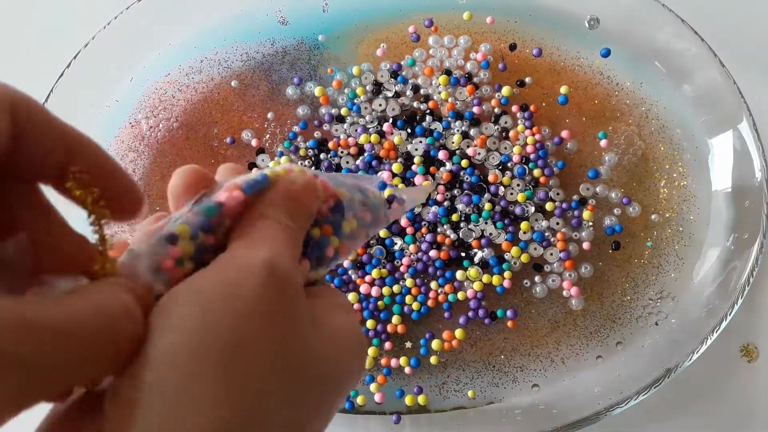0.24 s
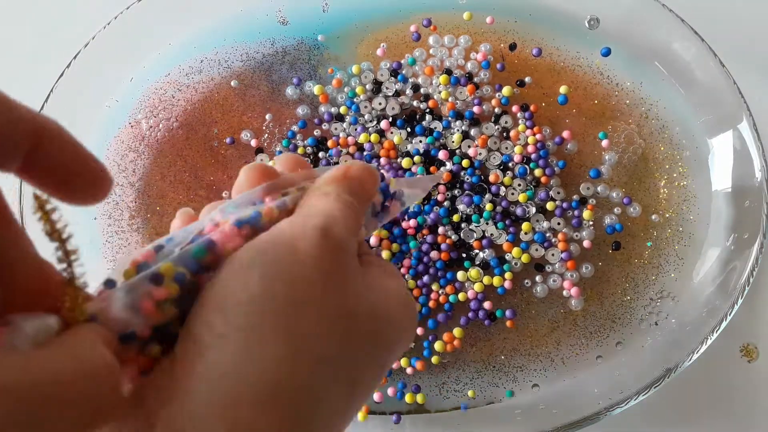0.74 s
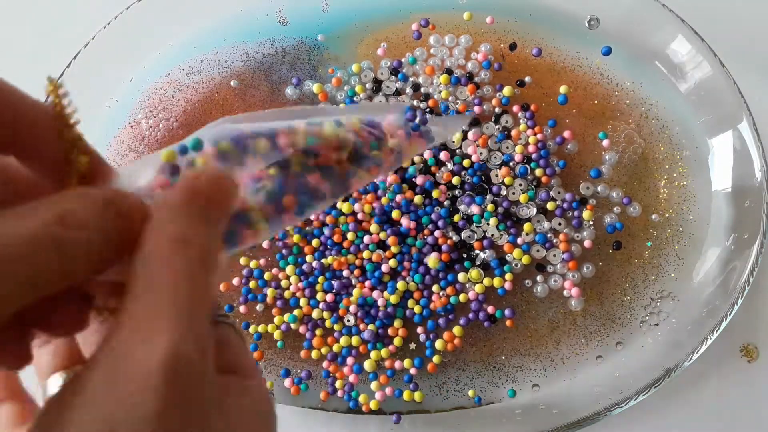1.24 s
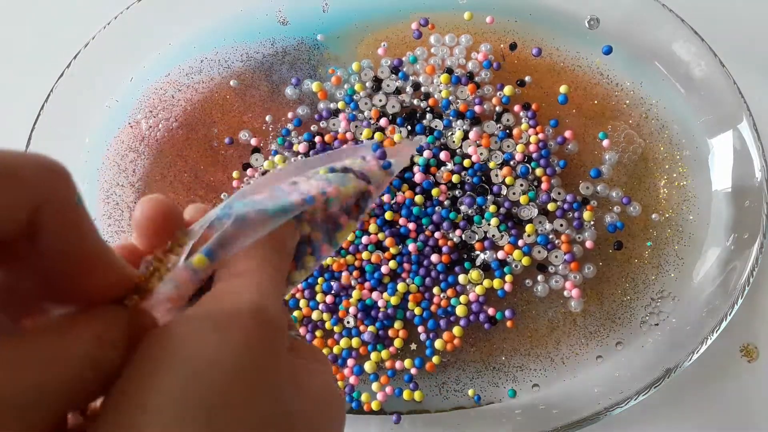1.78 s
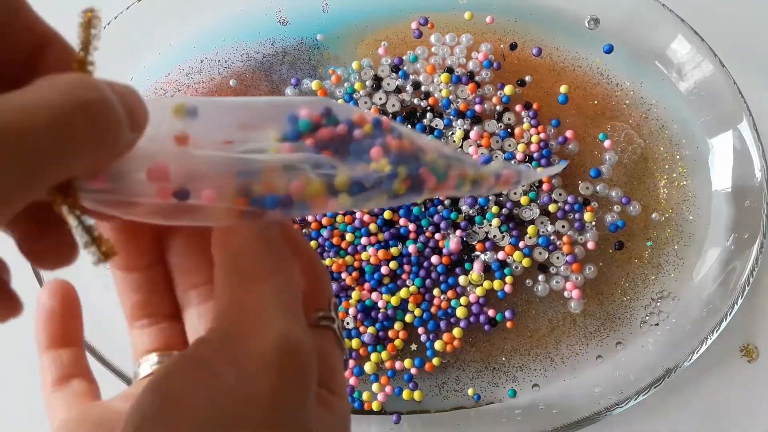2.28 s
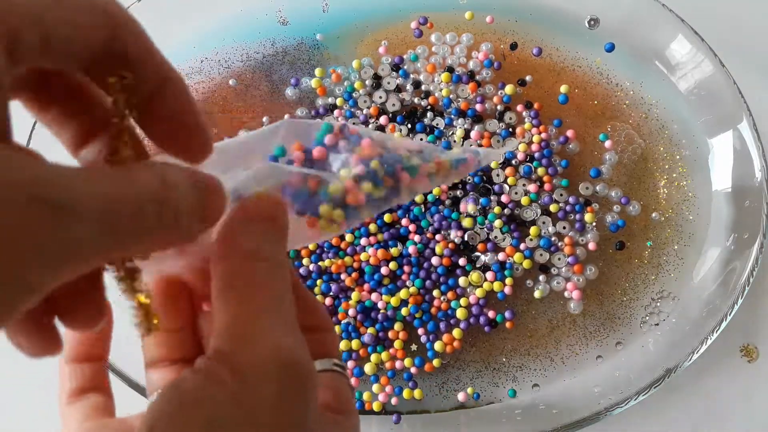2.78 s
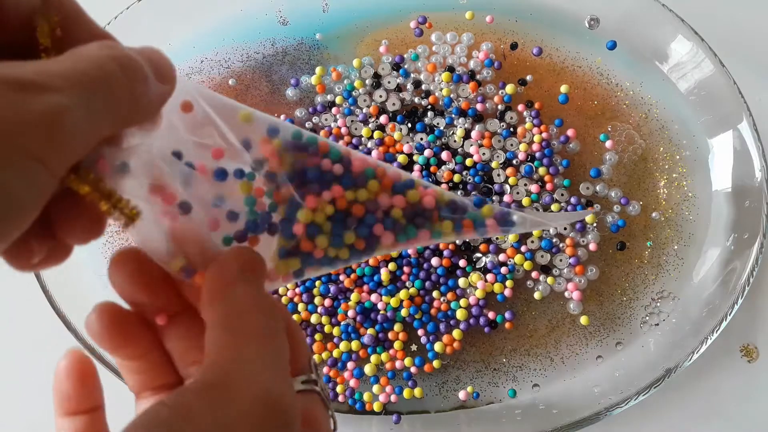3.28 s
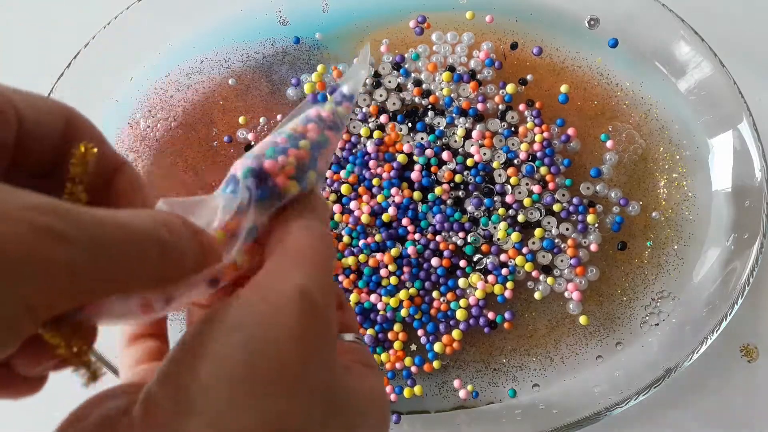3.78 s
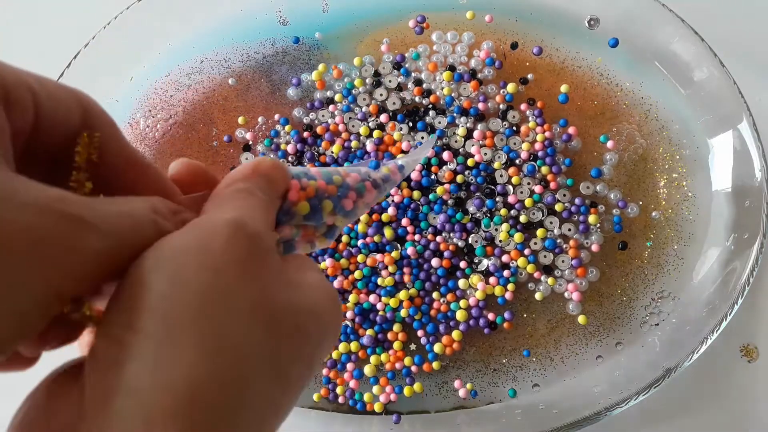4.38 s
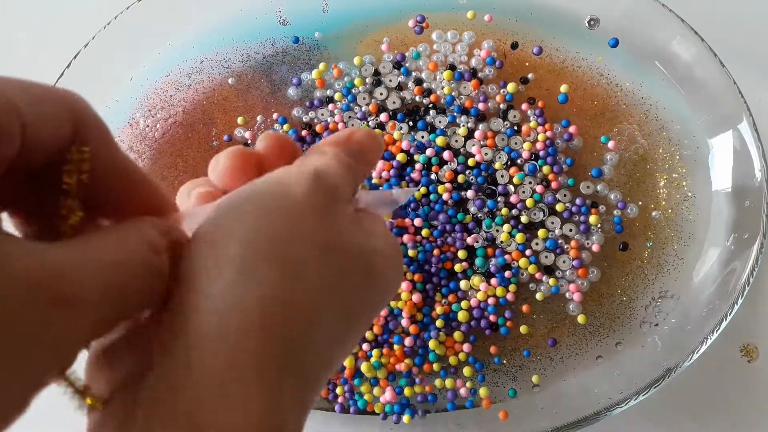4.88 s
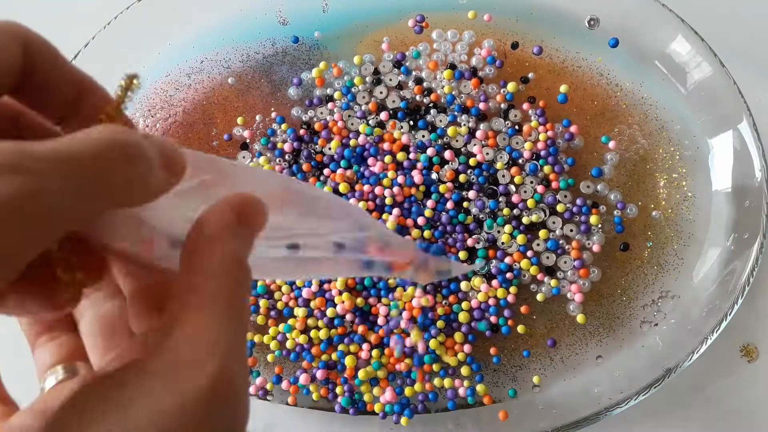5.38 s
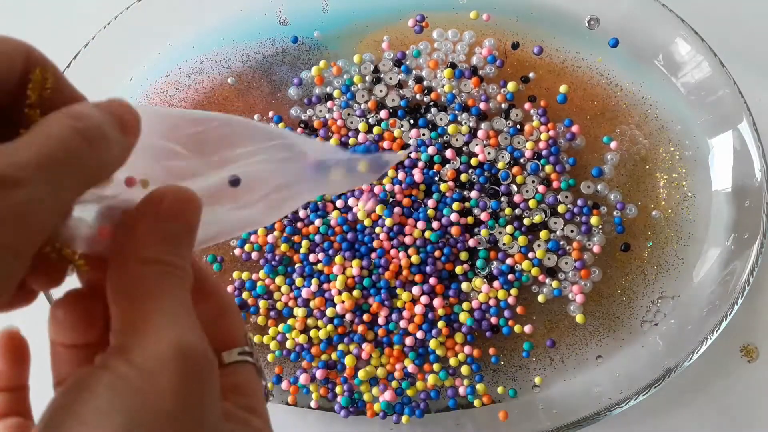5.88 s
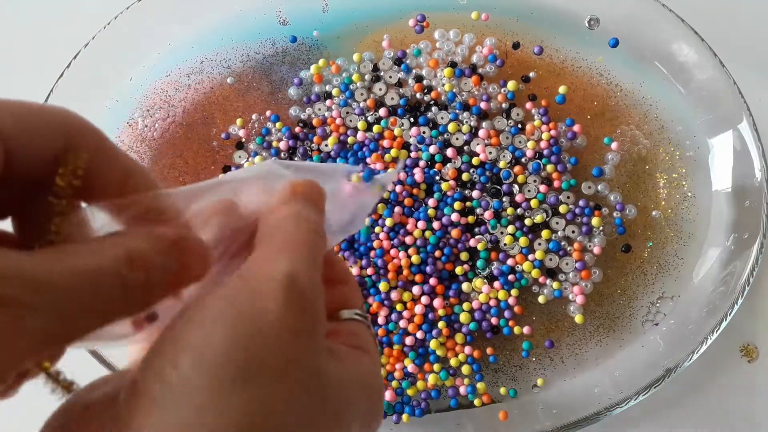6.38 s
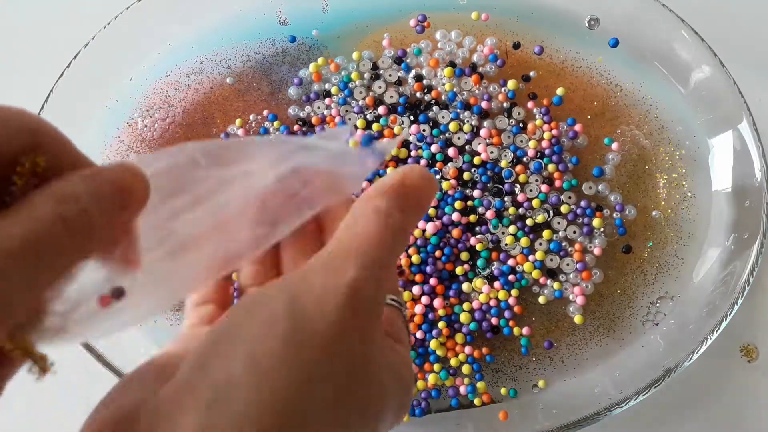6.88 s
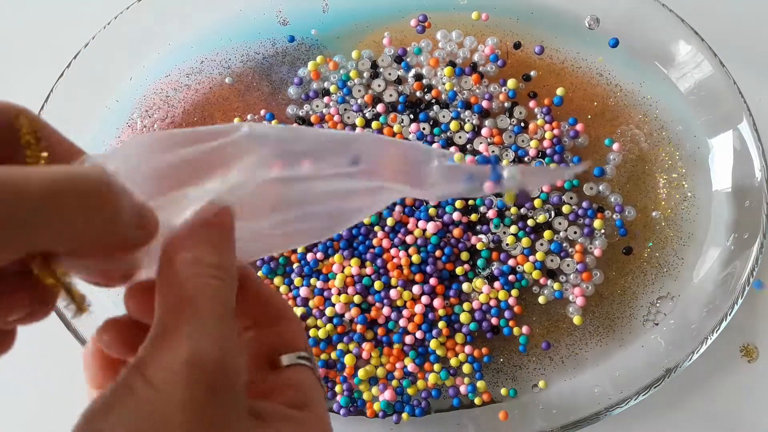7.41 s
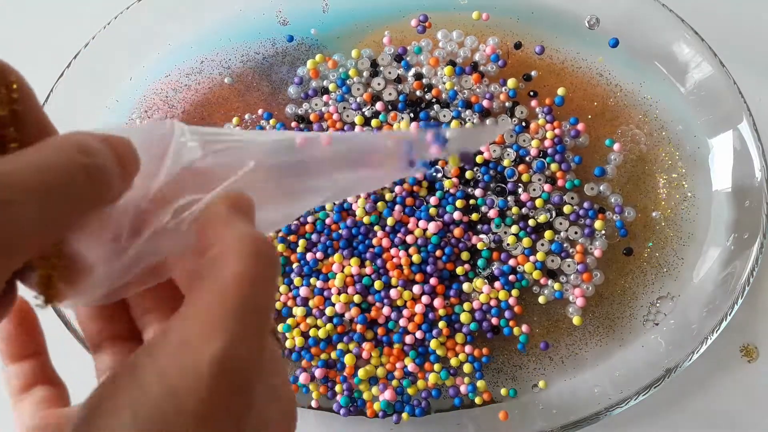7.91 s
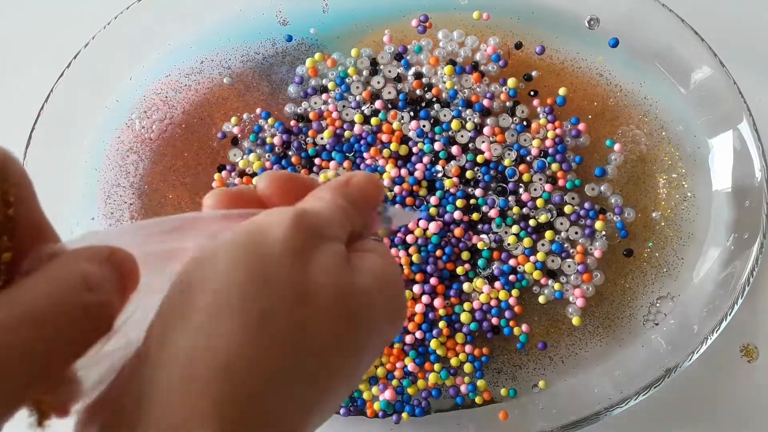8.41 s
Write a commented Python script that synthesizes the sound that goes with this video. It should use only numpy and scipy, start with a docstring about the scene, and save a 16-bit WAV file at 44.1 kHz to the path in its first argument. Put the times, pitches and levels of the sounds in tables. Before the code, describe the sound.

Close-up kneading of a filmy plastic bag: crisp snaps, fine rustling and tiny bead ticks in uneven bursts over faint room air.

```python
"""In a small room, hands knead a thin plastic piping bag of small beads over slime, close to the microphone.
Creases snap: a jump and a run of slips drive a ringing film. Squeezes rustle: clumped clicks ring facets and beads.
Decaying tones knock on the film and low noise puffs mark its jolts. Echoes and a diffuse tail answer the bag.
Behind it lie shaped air noise and a faint low hum, two tones in a rumble, that swells once."""
import sys
import numpy as np
from scipy import signal
from scipy.fft import rfft, irfft
from scipy.io import wavfile

SR = 44100
rng = np.random.default_rng(int(sys.argv[2]) if len(sys.argv) > 2 else 0)


def materialize(psi):
    """Save the field psi as 16-bit PCM at rate SR to the path in sys.argv[1].

    A 1-D psi becomes a single channel; in a 2-D psi each row is a channel.
    """
    bounded = np.clip(np.atleast_2d(psi).T, -1, 1)
    quanta = np.round(bounded * 32767).astype(np.int16)
    wavfile.write(sys.argv[1], SR, quanta)


N = 381465
TIME = np.arange(N) / SR  # [s]


def from_db(db):
    """Decibels to gain."""
    return 10 ** (np.asarray(db) / 20)


def rms_one(x):
    """Scale each row to unit power."""
    return x / np.sqrt(np.mean(x ** 2, axis=-1, keepdims=True) + 1e-20)


def at_hz(points, hz):
    """Read a (frequency, value) table on a log-frequency axis."""
    table_hz, value = np.transpose(points)
    return np.interp(np.log(hz + 1e-9), np.log(table_hz), value)


def band(x, low_hz, high_hz, order=2):
    """Causal Butterworth band-pass."""
    sos = signal.butter(order, [low_hz, high_hz], "band", fs=SR, output="sos")
    return signal.sosfilt(sos, x + 1e-18)


def resonate(x, hz, q):
    """One damped resonance, gain 1 at its peak."""
    b, a = signal.iirpeak(hz, q, fs=SR)
    return signal.lfilter(b, a, x + 1e-18)


def drift(points_per_s):
    """Slow random wander: straight lines between normal random points of spread 1."""
    return np.interp(TIME * points_per_s, np.arange(4000), rng.standard_normal(4000))


def add(out, start_s, sound):
    """Mix a sound in at its start time."""
    i = min(max(int(round(start_s * SR)), 0), len(out))
    out[i:i + len(sound)] += sound[:len(out) - i]


def swell(start_s, length_s, attack_s, release_s):
    """Exponential build-up to 1 by the start, a hold, then exponential decay."""
    early_s = np.maximum(start_s - TIME, 0)
    late_s = np.maximum(TIME - start_s - length_s, 0)
    return np.exp(-np.minimum(early_s / attack_s + late_s / release_s, 20))


def bursts(ring_hz, q, slip_s, flap_db, crack_db):
    """Buckling creases, one row each: a jump and tiny slips ring the facet, flap the sheet and crack its edge."""
    t = np.arange(512) / SR
    slips = rng.standard_normal((len(ring_hz), len(t)))
    slipping = np.exp(-t / np.maximum(slip_s, 2e-4))
    ring_out = .17 * np.exp(-t / .0011)  # brief, between fingers and film
    force = slips * (slipping + ring_out)
    force[:, 0] = 2 * np.sign(slips[:, 0])  # the jump
    # each facet favours the frequencies around its own pitch
    edges_hz = np.geomspace(1500, 7800, 9)
    facet = 0
    for k, (low_hz, high_hz) in enumerate(zip(edges_hz, edges_hz[1:])):
        centre_hz = np.sqrt(low_hz * high_hz)
        detuning = q * (centre_hz / ring_hz - ring_hz / centre_hz)
        gain = np.sqrt(centre_hz / (1 + detuning ** 2))
        facet = facet + (-1) ** k * gain * rms_one(band(force, low_hz, high_hz))
    body = rms_one(band(force, 124, 1030, order=1))
    sheet = rms_one(band(force, 720, 1706)) - from_db(-7) * body
    edge = band(force, 8500, 18000)
    return rms_one(facet) - from_db(flap_db) * rms_one(sheet) + from_db(crack_db) * rms_one(edge)


def creases(start_s, level_db, *character):
    """Place creases in time, each facet ring at its level as power over 3 ms."""
    out = np.zeros(N)
    for start, sound in zip(start_s[:, 0], from_db(level_db) * bursts(*character)):
        add(out, start, sound)
    return np.sqrt(.003 * SR / 512) * out


def snaps():
    """Creases that stand out, loud or alone in a quiet moment, buckle; neighbours give way weakly just after."""
    # creases that stand out: (time [s], ring level over 3 ms [dB], ring pitch [Hz], ring sharpness [Q],
    # slipping time, at least 0.0002 in use [s], sheet flap re level [dB], edge crack re level [dB])
    clear_creases = [(.075,-23.5,5290,0.8,0.00041,-13,-8.5),(0.0856,-26.5,5550,1,0.0024,-20,-16),(.1131,-23.5,4760,0.61,0.00039,-17,-11),(0.1164,-31,3360,2.9,.0002,-2.5,-15),
                     (0.1922,-32.5,4160,0.72,.0005,-23,-17),(.272,-34.5,4370,1,0.0014,-22,-19),(0.369,-32,2940,1,0.0004,-17,-25),(0.4112,-30.5,5960,3.3,.0002,-20,-17),(.435,-22,5640,1,0.00045,-18,-16),
                     (0.507,-28,3300,4.8,.0002,-18.5,-21),(.536,-27.5,3690,0.61,.0008,-16,-9),(0.6492,-30.5,4580,1.6,0.0021,-18.5,-9),(0.7836,-18.5,3070,2.5,0.0011,-21,-15),
                     (.7965,-31,3000,4,.003,-20,-22),
                     (0.9475,-34.5,4640,0.83,0.0033,-17,-7),(.988,-23,5300,2.9,0.00085,-17,-13),(1.0777,-30,4200,2.7,0.00018,-19,-25),(1.4433,-35,4340,3.3,0.0021,-15.5,-16),
                     (1.5242,-21.5,4470,1.3,0.002,-14.5,-13),(1.599,-25.5,5170,0.27,0.004,-16,-8),(1.6191,-28,6000,2.4,0.00034,-10.5,-6),(1.791,-33.5,2650,1.9,.0005,-14,-8),
                     (1.8634,-26,3300,1.1,.0002,-20,-24),(1.8684,-20.5,6110,.8,0.00018,-29,-6),(1.8855,-34.5,4160,.9,0.00027,-0.5,5),(1.9601,-27.5,5100,1.7,0.00014,-28,-27),
                     (1.9793,-24.5,5300,1.5,0.00018,-26,-14),(2.041,-26,4180,0.96,0.00029,-16.5,-13),(2.573,-29.5,3727,1.8,0.0043,-12,-23),(2.6346,-30,4140,1.3,0.00074,-7.5,-2),
                     (2.7583,-25,4810,0.69,0.0019,-11.5,-1),(2.9518,-36.5,4530,0.72,0.00056,-11,-11),(2.9692,-38.5,3870,2.6,.0004,-0.5,-9),
                     (3.009,-20.5,3640,0.93,0.0015,-21,-16),(3.0157,-20.5,3730,7.5,0.0018,-9.5,-15),
                     (3.026,-24,4410,1.6,.0012,-12,-5.5),(3.064,-21.5,5290,1.5,0.0021,-12.5,-9),(3.077,-26,4470,1.1,.0003,-29,-15),(3.117,-25.5,4300,2.5,0.00044,-17,-3),
                     (3.164,-18.5,4800,2.1,0.00018,-31,-16),(3.1775,-18,3860,2.2,0.0035,-12,-9.5),(3.193,-25.5,3600,4.4,0.00067,-6,-10),(3.2235,-23,3120,1,0.0011,-16,-4.5),
                     (3.2285,-20,3900,1.3,0.0028,-9.5,-11),(3.3107,-37,3260,2,0.0011,-9,-26),
                     (3.4032,-34,3500,3.3,0.0003,-6,-24),(3.4213,-26,3720,8.1,0.0014,-21,-24),(3.439,-27,3920,1,0.00094,-19,-7),
                     (3.464,-27,5960,0.71,.0003,-16,-14),(3.4828,-26,3870,1.06,.0002,-24,-9),(3.5053,-19.5,3840,1.8,0.0024,-9.5,-6),(3.542,-24,4130,1.7,0.0014,-27,-5),
                     (3.6026,-27.5,4630,4.3,0.0009,-28,-13),(3.6426,-26.5,4580,1.3,0.00015,-33,-3),(3.6521,-30,1950,3.7,0.0006,-18,-17),(3.744,-25,4260,2,.0004,-15.5,-12),
                     (3.783,-22,4760,3.3,0.00038,-19,-7.5),(3.8295,-24,5170,1.4,0.00047,-19.5,-4.5),(3.8814,-30.5,2320,1.1,.0011,-17,-16),(3.888,-34.5,5170,.8,.0002,-13,-5),
                     (4.0562,-28,5540,5.2,.0002,-18,-13),
                     (4.1239,-29.5,3995,2,0.0016,-18,-19),(4.1427,-28,3460,1,0.00074,-15,-20),(4.148,-32,4580,2.3,.0008,-21,-1),(4.1792,-30,4580,1.12,0.0013,-21,-5),
                     (4.2162,-32.5,4370,0.38,.0011,-14.5,-9),(4.2444,-27,6100,0.64,0.00015,-15,1),(4.2611,-32.5,4350,.9,.0003,-27,-6),
                     (4.3164,-34.5,4900,0.49,0.00017,-17,-6),(4.3701,-33,5740,1.6,0.00018,-21,-1),
                     (4.3818,-26,3200,1.9,.0006,-24,-12),(4.46,-25,4470,1.5,.0002,-15.5,-4),(4.59,-28,3860,1.2,0.00018,-14,5.5),(4.611,-27,3460,2.7,0.0028,-22,-14),
                     (4.6268,-28,4920,0.97,.0002,-24,1),(4.6419,-26.5,5420,1.3,0.00084,-11.5,-12),(4.7064,-25.5,3410,0.89,0.00019,-19,-5),(4.7821,-33.5,5820,5.8,.0002,-19,-6),
                     (4.9309,-31,4285,1.02,0.0015,-20.5,-6),(4.9931,-33.5,4470,2.2,.0003,-18,-12),(5.0285,-33.5,4200,2.9,.0002,-17,-14),
                     (5.0749,-25,4690,8.7,.0007,-15.5,-14),(5.197,-24.5,5480,2.6,0.00018,-20,-13),
                     (5.3035,-25.5,4300,9.1,0.00045,-14,-14),(5.4818,-30.5,5320,1.1,0.00029,-19,-4),(5.5245,-24,3320,1.8,0.00047,-19,-16),(5.5498,-29,2900,1.1,0.00023,-14.5,-9),
                     (5.5736,-28,4450,2.2,0.0018,-15,-8),(5.6,-30.5,4400,1.6,0.00072,-8,-1.5),(5.6564,-28.5,5800,1.7,0.0003,-20,-1),(5.832,-31,5760,1.4,0.00034,-16.5,-18),
                     (5.841,-29.5,4940,0.9,.0002,-5.5,-14.5),(5.848,-21.5,5620,0.83,0.00036,-17,-11),(5.885,-20.5,5100,2.1,0.00023,-24,-9),(5.969,-31.5,5290,1.7,.0006,-19,-13),
                     (5.9751,-26.5,4690,0.97,0.0015,-6.5,-8.5),
                     (6.062,-32,4440,0.65,0.0004,-9,-8),(6.077,-35,5420,0.84,0.00079,-28,1),
                     (6.117,-32,4150,1.6,.0008,-12,-10),(6.196,-27.5,5290,1.4,.0002,-23,-12.5),(6.2018,-20,5960,1.1,0.0026,-14,-6.5),
                     (6.24,-26.5,5130,0.63,.0006,-13,-24),(6.261,-26,4860,1,0.0022,-7.5,-19),(6.269,-22.5,5040,0.63,0.00031,-16,-11),(6.2829,-32.5,4520,1,.0003,-28,-13),
                     (6.3022,-22.5,6890,1.3,0.00077,-14,-8),(6.3207,-25.5,4580,1.2,0.00025,-9.5,-3),(6.3446,-28.5,4470,0.78,0.00032,-10,-9),(6.388,-25.5,5690,1.6,0.00049,-14,-5),
                     (6.4387,-25,4920,10,0.00028,-16,2),(6.447,-25,5670,2.8,0.00016,-5,-14),(6.508,-26,5400,2.9,0.00015,-18,-14),(6.5212,-25,4970,5.1,0.00044,-28,-11),
                     (6.5686,-29,4770,1.2,0.00074,-18,-2),(6.606,-30.5,5690,5.5,0.00016,-30,-8),(6.6741,-18.5,4460,2,0.00015,-17.5,-10.5),(6.7001,-27.5,6110,0.79,0.00018,-32,-15),
                     (6.7884,-38,4310,.9,0.00039,-14,-1),
                     (6.8189,-29.5,4120,1.5,0.00023,-12.5,-16),(6.823,-30.5,2154,8,0.00043,-15,-29),(6.883,-36,4690,3,.0002,-15,-16.5),(6.9316,-35.5,3600,1.4,0.00017,-16,-14),
                     (6.957,-28,4920,0.18,0.00089,-13.5,-3.5),(7.0732,-36,3680,1.8,0.00057,-16,-12),(7.1145,-24,4120,2.7,0.00044,-14,-9),(7.1171,-25.5,3760,1.5,0.003,-9.5,-6),
                     (7.1352,-28,3690,0.74,0.00056,-15,-14),(7.1945,-27.5,3990,3.15,0.00059,-17,-9),(7.2348,-30.5,3470,2.3,.0015,-15,-17),(7.2694,-24.5,2925,1.7,.0002,-11,-11),
                     (7.3008,-22,2910,.8,0.0012,-7,-5.5),(7.3317,-24.5,3900,4.9,0.0003,-26.5,-15),(7.4734,-25.5,4380,7.8,0.0013,-9.5,-8),(7.504,-27.5,4200,4,0.00022,-13.5,-15),
                     (7.617,-30.5,2270,1.7,0.00052,-7.5,-24.5),(7.6661,-26,3910,7,0.0063,-7,-11),(7.6743,-27.5,3550,2.3,0.002,-11,-23),(7.777,-21,3970,15.3,0.00016,-11,-16),
                     (7.889,-29.5,4050,2.3,0.00034,-14,-12),(7.912,-32,4880,2.2,0.00034,-18,-5),(7.9806,-34,3200,1.3,0.00047,-23,-7),(8.0774,-32.5,2950,6.3,0.00062,-24,-22),
                     (8.1021,-24,3287,1.36,0.00049,-15,-24),(8.1226,-23.5,5420,1.5,0.00022,-11,-0.5),(8.1657,-18.5,7360,0.2,0.00021,-13,-1),(8.2004,-27.5,4810,3.4,.0003,-17,-17),
                     (8.2095,-27,4050,0.59,.0007,-12,-5),(8.2345,-27,3600,1.6,.0003,-9,-18),(8.371,-31,5510,2,0.00016,-10,1.5),(8.387,-28.5,5100,1.7,.0007,-15,-3.5),
                     (8.5182,-26,7500,1.8,0.00044,-15,-8.5), (8.6162,-33.5,5000,1.4,0.00048,-10.5,-12)]
    neighbours, neighbour_db, neighbour_spread_db = 3, -18, 2
    wait_s, pitch_spread = 0.012, 0.45  # pitch spread in natural log
    start_s, level_db, ring_hz, *character = np.transpose(clear_creases)[:, :, None]
    out = creases(start_s, level_db, ring_hz, *character)
    for _ in range(neighbours):
        delay, size, detune = rng.standard_normal((len(start_s), 3)).T[:, :, None]
        later_s = start_s + wait_s * np.abs(delay)
        weaker_db = level_db + neighbour_db + neighbour_spread_db * size
        out += creases(later_s, weaker_db, ring_hz * np.exp(pitch_spread * detune), *character)
    return out


def small_snaps(rustle, flex):
    """Lesser creases give way at random, more often and louder the harder the bag is worked."""
    slots, rate_per_s, work_exponent = 600, 26, .6  # rate at drive 1
    level_db, level_spread_db, colour_spread_db = -38, 3, 4  # level at drive 1
    median_hz, q, median_slip_s = 4200, 4.5, 0.0011
    pitch_spread, slip_spread = 0.4, .6  # natural log
    flap_db, crack_db = -9, -10.5  # re level; flap where flex equals rustle
    work = rms_one(np.sqrt(rustle * flex))
    place, luck = rng.random((slots, 2)).T
    size, detune, slip, flap, crack = rng.standard_normal((slots, 5)).T
    start_s = (np.arange(slots) + place) / slots * TIME[-1]
    drive = np.interp(start_s, TIME, work) ** work_exponent
    # slack film flaps more
    slack_db = 10 * np.log10(np.interp(start_s, TIME, flex / rustle))
    rows = np.array([
        start_s,
        level_db + 20 * np.log10(drive) + level_spread_db * size,
        median_hz * np.exp(pitch_spread * detune),
        np.full(slots, q),
        median_slip_s * np.exp(slip_spread * slip),
        flap_db + slack_db + colour_spread_db * flap,
        crack_db + colour_spread_db * crack])
    happens = luck < drive * rate_per_s * TIME[-1] / slots
    return creases(*rows[:, happens, None])


def effort():
    """Drive of rustle and flexing: the strongest squeeze at each moment, over the bag merely held."""
    # squeezes or shifts of grip, levels ahead of the kneading mix: (start [s], length [s],
    # fine crinkle and bead rustle level [dB], slack film flexing level [dB])
    squeezes = [(0,0.21,-38.5,-50.5),(.23,.12,-45,-69),(.36,.1,-41.5,-64),(0.478,.12,-35.5,-55.5),(0.615,.11,-38,-58),(0.78,0.049,-38,-59),(.85,0.058,-40.5,-61),(0.952,.09,-35,-58),(1.077,0.46,-47.5,-67),
                (1.46,0.083,-40.5,-55.5),(1.599,0.045,-35,-50),(1.673,0.13,-38.5,-65),(1.856,0.17,-41,-51),(2.086,0.093,-46,-61.5),(2.257,0.051,-45.5,-65.5),(2.373,0.1,-50,-70),
                (2.542,0.11,-40,-55.5),(2.72,0.062,-39.5,-52),(3.004,.215,-42,-47),(3.374,0.25,-44,-49),(3.61,.06,-41.5,-57),(3.714,0.029,-33,-49.5),(3.832,0.11,-44,-57),
                (4.065,0.15,-42.5,-55.5),(4.387,0.2,-39.5,-62),(4.582,0.079,-30,-48.5),(4.686,0.17,-42.5,-68.5),(4.925,0.11,-42,-59.5),(5.084,0.12,-48.5,-69),(5.212,0.033,-38,-56),(5.291,.05,-38,-54.5),
                (5.385,0.077,-45.5,-62.5),(5.532,.06,-41,-58),(5.75,.06,-47,-55.5),(5.829,0.13,-44,-49.5),(6.089,.08,-45,-51.5),(6.188,.16,-39.5,-48),(6.424,0.22,-48.5,-56.5),
                (6.795,.04,-38.5,-51),(7.098,0.042,-38.5,-45),(7.228,0.077,-38,-43.5),(7.391,0.19,-43,-53.5),(7.633,0.05,-45,-49),(7.713,0.075,-37.5,-40.5),(7.885,0.087,-45,-57),
                (8.081,0.17,-37,-46),(8.337,0.071,-38.5,-54)]
    attack_s, release_s = .013, 0.027
    held_rustle_db, held_flex_db = -54.5, -80
    rustle = np.full(N, from_db(held_rustle_db))
    flex = np.full(N, from_db(held_flex_db))
    for start_s, length_s, rustle_db, flex_db in squeezes:
        grip = swell(start_s, length_s, attack_s, release_s)
        rustle = np.maximum(rustle, from_db(rustle_db) * grip)
        flex = np.maximum(flex, from_db(flex_db) * grip)
    return rustle, flex


def grains(colour, per_s, spread_db, clump_db, q, shared, count=18):
    """Clumps of tiny clicks: each rings one facet or bead most and the others a little."""
    rate_per_s = per_s * from_db(clump_db * drift(45))
    born = rng.random(N) < rate_per_s / SR
    size_db = spread_db * np.minimum(rng.exponential(1, N), 4)
    clicks = born * from_db(size_db) * rng.choice([-1, 1], N)
    dealt = rng.integers(0, count, N)
    width = 1 + .5 / q
    out = 0
    for k, hz in enumerate(np.geomspace(colour[0][0], colour[-1][0], count)):
        strength = (dealt == k) + shared * rng.standard_normal(N)
        out = out + from_db(at_hz(colour, hz)) * band(clicks * strength, hz / width, hz * width)
    return rms_one(out)


def kneading(rustle, flex):
    """The squeezed bag rustles with fine creases, beads tick against each other, slack film crumples lower."""
    # relative colour of fine creases and beads: (frequency [Hz], band gain [dB])
    rustle_colour = [(900, -14), (1500, -2), (2300, 0.5), (3500, 6), (5000, 4.5), (7000, 1), (8400, -8),
                     (11000, -4), (16000, -10.5)]
    # relative colour of slack film: (frequency [Hz], band gain [dB])
    flex_colour = [(200, -13), (400, -6.5), (650, -2.5), (1200, -0.5), (2000, 1), (3500, -35)]
    fine_db, tick_db, slack_db = -5, -7.5, -1
    fine = grains(rustle_colour, per_s=1100, spread_db=3.0, clump_db=3.5, q=2.5, shared=.35)
    ticks = grains(rustle_colour, per_s=200, spread_db=3.0, clump_db=3.0, q=5.0, shared=.2, count=20)
    slack = grains(flex_colour, per_s=600, spread_db=4.0, clump_db=4.5, q=2.57, shared=0.64, count=10)
    crinkle = from_db(fine_db) * fine + from_db(tick_db) * ticks
    return rustle * crinkle + flex * from_db(slack_db) * slack


def knocks():
    """A loose bead drops against slack film, which gives a short hollow note like a limp drumhead."""
    # bead knocks: (time [s], level ahead of the trim [dB], pitch [Hz])
    bead_knocks = [(3.026,-30,760),(3.384,-42,736),(5.878,-30,900),(6.1421,-29,750),(6.4482,-31.5,950),(7.668,-33,700),(7.727,-35,650),(7.778,-28.5,660),(8.241,-27,710)]
    trim_db, ring_s = -2, 0.0034
    t = np.arange(2048) / SR
    out = np.zeros(N)
    for start_s, level_db, hz in bead_knocks:
        note = np.exp(-t / ring_s) * np.sin(2 * np.pi * hz * t)
        add(out, start_s, from_db(level_db + trim_db) * note)
    return out


def jolts():
    """The bag tugged taut, its load jolting, shoves a soft, dull puff of air at the microphone."""
    # tugs: (time [s], peak level [dB])
    tugs = [(0.072, -49), (1.523, -51), (3.014, -43.5), (3.163, -35.5), (3.177, -39), (3.506, -53),
            (5.657, -53), (6.44, -53), (6.674, -45.5), (7.3, -45), (7.78, -42.5), (8.164, -46)]
    decay_s, low_hz, high_hz = 0.0069, 24, 170
    t = np.arange(4096) / SR
    out = np.zeros(N)
    for start_s, level_db in tugs:
        puff = band(rng.standard_normal(len(t)) * np.exp(-t / decay_s), low_hz, high_hz)
        add(out, start_s, from_db(level_db) * puff / np.abs(puff).max())
    return out


def room(x):
    """Two scattered early echoes and a diffuse tail, redrawn per stretch as the hands carry the bag about."""
    # relative colour of the tail: (frequency [Hz], band gain [dB])
    tail_colour = [(60, -10), (300, 4.5), (700, 5), (1500, 5.5), (3500, 4.5), (7000, 6), (10000, -2),
                   (16000, 4)]
    # decay by 60 dB: (frequency [Hz], time [s])
    t60 = [(200, 0.6), (1000, 0.32), (4000, 0.39), (8000, 0.34), (16000, 0.51)]
    # scatter from near surfaces: (delay [s], level [dB])
    echoes = [(.0078, -30), (0.0183, -22.5)]
    stretches, tail_db, first_s, scatter_s = 9, -10.0, 0.0043, 0.00076
    t = np.arange(int(.5 * SR)) / SR
    edges_hz = np.geomspace(60, 19000, 11)
    tails = 0
    for low_hz, high_hz in zip(edges_hz, edges_hz[1:]):
        hz = np.sqrt(low_hz * high_hz)
        fade = from_db(at_hz(tail_colour, hz) - 60 * t / at_hz(t60, hz))
        tails = tails + fade * band(rng.standard_normal((stretches, len(t))), low_hz, high_hz, order=3)
    tails = tails * np.clip(t / first_s - 1, 0, 1)  # silent up to first_s, full at twice that
    out = np.zeros(N)
    for tail, stretch in zip(tails, np.array_split(np.arange(N), stretches)):
        response = from_db(tail_db) * tail / np.linalg.norm(tail)
        for delay_s, level_db in echoes:
            echo = rng.standard_normal(len(t)) * np.exp(-t / scatter_s)
            add(response, delay_s, from_db(level_db) * echo / np.linalg.norm(echo))
        add(out, stretch[0] / SR, signal.fftconvolve(x[stretch], response))
    return out


def room_air():
    """Steady quiet room noise: white noise shaped in frequency."""
    # relative colour of the air noise: (frequency [Hz], gain [dB])
    air_colour = [(25, -7.5), (60, -6.5), (125, 0), (200, -7.5), (320, -11), (700, -15), (2000, -18),
                  (6000, -9), (16000, -43)]
    level_db = -60.0
    spectrum = rfft(rng.standard_normal(N))
    gain = from_db(at_hz(air_colour, np.fft.rfftfreq(N, 1 / SR)))
    return from_db(level_db) * rms_one(irfft(spectrum * gain, N))


def hum():
    """Two low tones, wavering together inside a band of rumble, swell once."""
    lower_hz, upper_hz, waver_hz = 167, 228, 0.83
    rest_db, swell_db = -74.5, -61  # lower tone; the swell adds to the rest
    upper_db, rumble_db = -12, -5  # re lower tone
    waver = waver_hz * drift(12)
    lower = rms_one(np.sin(2 * np.pi * np.cumsum(lower_hz + waver) / SR))
    upper = rms_one(np.sin(2 * np.pi * np.cumsum(upper_hz + waver) / SR))
    rumble = rms_one(band(rng.standard_normal(N), 128, 270, order=3))
    rise = swell(start_s=2.49, length_s=0.36, attack_s=0.12, release_s=0.13)
    level = from_db(rest_db) + from_db(swell_db) * rise
    return level * (lower + from_db(upper_db) * upper + from_db(rumble_db) * rumble)


def scene():
    """The bag close by, its room, and the background."""
    rustle, flex = effort()
    bag = snaps() + small_snaps(rustle, flex) + kneading(rustle, flex) + knocks() + jolts()
    return (bag + room(bag) + room_air() + hum())[None]


def record(dry):
    """The microphone has a presence peak with a dip just above it; a steep low-pass cuts the top."""
    presence_hz, presence_db, presence_q = 7000, 4, 4.6
    dip_hz, dip_db, dip_q = 8300, -8, 4.9
    cutoff_hz = 15800
    x = dry + (from_db(presence_db) - 1) * resonate(dry, presence_hz, presence_q)
    x = x + (from_db(dip_db) - 1) * resonate(x, dip_hz, dip_q)
    return signal.sosfilt(signal.ellip(10, .2, 70, cutoff_hz, fs=SR, output="sos"), x)


dry = scene()
out = record(dry)
materialize(out)
```